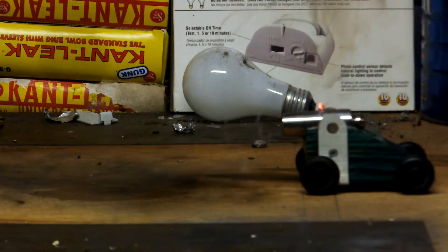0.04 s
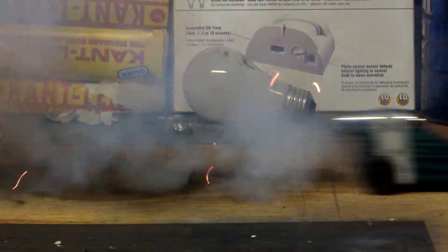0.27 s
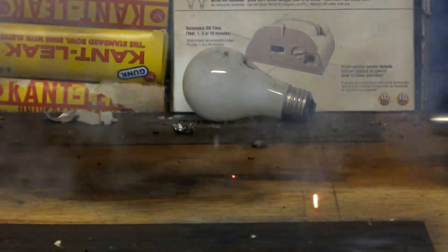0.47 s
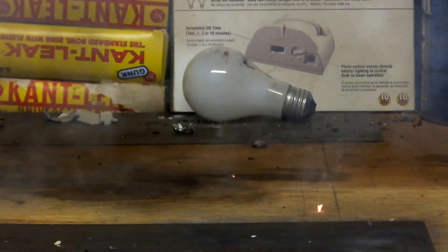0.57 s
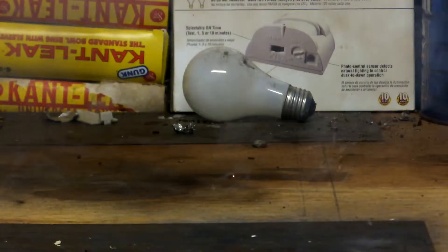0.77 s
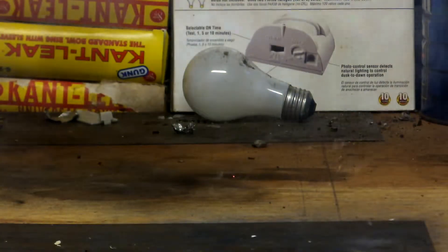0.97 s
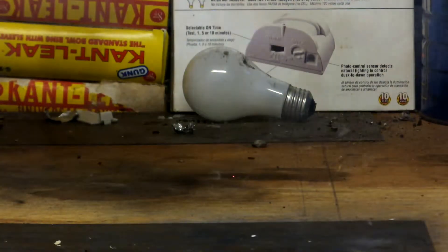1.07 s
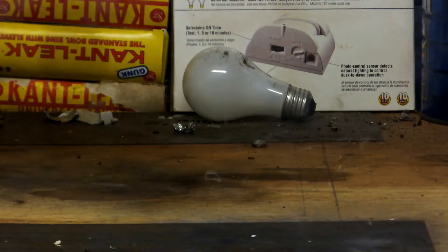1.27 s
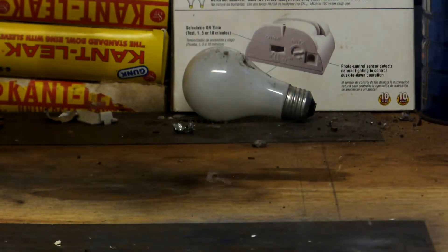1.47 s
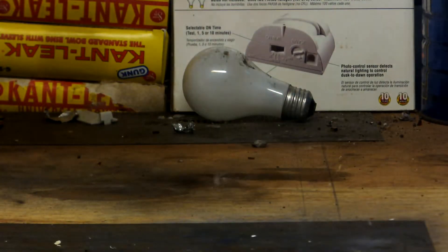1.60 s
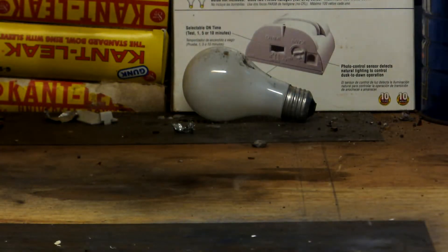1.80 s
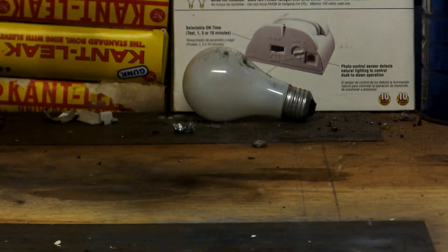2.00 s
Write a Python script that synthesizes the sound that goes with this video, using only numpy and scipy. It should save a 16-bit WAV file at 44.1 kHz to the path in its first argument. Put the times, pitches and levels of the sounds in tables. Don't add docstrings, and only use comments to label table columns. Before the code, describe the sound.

A tiny powder cannon fires one overloaded bang that booms through a large hard room

```python
import sys
import numpy as np
from scipy import signal
from scipy.io import wavfile
from scipy.ndimage import uniform_filter1d

SR = 44100
rng = np.random.default_rng(int(sys.argv[2]) if len(sys.argv) > 2 else 0)


def makeup_ratio(level_db):
    decades = np.asarray(level_db, float) / 20
    return 10 ** decades


def waveform_to_disk(signal):
    frames = np.transpose(np.atleast_2d(signal))
    scaled = np.clip(frames, -1, 1) * 32767
    samples = np.round(scaled).astype(np.int16)
    wavfile.write(sys.argv[1], SR, samples)


N = 90404

# (frequency [Hz], level [dB per Hz])
FLOOR_COLOUR = [(25, -20), (90, -8.5), (290, -8.5), (800, -15), (1900, -16), (4000, -24), (8000, -29),
                (15600, -31)]
# (frequency [Hz], level [dB], width [Hz])
HUM_BANDS = [(104.8, -64, 8), (146.3, -54, 18), (319, -53.5, 22)]
# (frequency [Hz], likeness [0-1])
FLOOR_LIKENESS = [(60, 0.66), (180, 0.94), (550, 0.33), (1650, 0.37), (5000, 0.3), (15000, .94)]
# (frequency [Hz], likeness [0-1])
BLAST_LIKENESS = [(60, .96), (180, .93), (550, .99), (1200, .985), (2300, .94), (5000, .87), (15000, .99)]
# (frequency [Hz], left minus right [dB])
STEREO_LEAN = [(60, -6.5), (240, -1.5), (950, -.5), (3770, -1), (15000, -0.1)]
# (time [s], level [dB])
FIZZ_LEVEL = [(0, -50), (.1, -48.5), (.2, -52.5), (.7, -47), (1.05, -45.5), (1.14, -47.5), (1.25, -45),
              (1.45, -47), (1.7, -61.5), (2.05, -61.5)]
# (time [s], peak level [dB], centre [Hz], sharpness [Q])
EMBERS = [(0.0107, -37.5, 3360, 4.5), (0.0116, -41, 1580, 4), (0.1122, -35, 3320, 5.3),
          (.1116, -39, 1550, 4.4), (0.544, -23.5, 13000, 1.1), (.6354, -31, 7000, 0.89),
          (0.645, -31, 13000, 1.2), (0.657, -38, 10000, 1.5), (0.662, -33.5, 10500, 2.1),
          (0.687, -32, 11900, 1.5), (0.727, -27, 12500, 1), (.8094, -38, 9000, 1), (.963, -39, 6570, 2),
          (1.0486, -26.5, 7920, 0.84), (1.1012, -30.5, 12000, 2.2), (1.166, -41.5, 12000, 1),
          (1.1803, -31, 14800, 2.37), (1.182, -34, 4500, 0.88), (1.194, -28, 3400, 1.4),
          (1.196, -34, 12050, 1), (1.222, -31, 9000, 1.4), (1.2317, -36, 9000, 1),
          (1.2382, -32.5, 9000, 0.96), (1.2534, -34, 6070, 1.1), (1.274, -38, 10500, 1.5),
          (1.2966, -44, 11000, 1), (1.3267, -30, 9000, 1.1), (1.414, -41, 8400, 1.5),
          (1.7292, -37, 5000, 0.56), (1.8248, -44.5, 8500, 3.3)]
# (time [s], level [dB], T60 [s])
RATTLES = [
    (0.56, -26.5, 0.18),
    (0.671, -29, .1),
    (0.692, -20, 0.13),
]
# (frequency [Hz], width [Hz], level [dB])
RATTLE_BANDS = [(5480, 380, 1.5), (5900, 170, 2.5), (7800, 500, -15)]
# (time [s], level [dB], centre [Hz])
FAR_KNOCKS = [
    (.893, -34, 700),
    (1.488, -35, 1500),
    (1.724, -47, 2500),
]
# (frequency [Hz], level [dB per Hz])
BOOM_COLOUR = [(30, -48), (75, -39), (130, -20), (330, -8), (600, -3.5), (1650, -9), (2800, -17),
               (8000, -19.5), (15600, -22)]
# (frequency [Hz], T60 [s])
ROOM_DECAY = [(60, 0.6), (150, 2.55), (400, 2.416), (800, 1.67), (1600, 1.117), (3500, 0.76), (7000, 0.58),
              (14000, 0.29)]
# (frequency [Hz], time [s])
ROOM_FILL = [(100, 0.42), (400, 0.23), (900, 0.1), (2000, 0.037), (8000, 0.037)]
# (frequency [Hz], lift [dB])
FAR_END_LIFT = [(400, -4.5), (1500, 3), (5000, 5.5), (14000, 3.5)]
# (frequency [Hz], level [dB per Hz])
CRACK_COLOUR = [(60, -38.5), (150, -11), (400, 4.5), (700, 0.5), (1500, -5.5), (2600, -8), (8000, -9),
                (15600, -15)]
# (frequency [Hz], T60 [s])
NEAR_WALL_DECAY = [(100, 0.23), (400, 0.57), (1500, 0.49), (3000, .12), (10000, .1)]
# (frequency [Hz], level [dB], T60 [s])
STANDING_WAVES = [(103, -16, 4), (157.1, -8, 4), (160.6, -12, 5), (164.1, -6, 3), (196.7, -8, 3.2),
                  (360.8, -3, 3), (366.8, -2, 3), (402.5, -3, 3), (408.8, 2, 2.8), (449.5, -3, 3),
                  (474.8, -3, 3), (581.5, -1, 2.8), (602, -2, 3), (641.8, -2, 2.8)]
# (time [s], gain [dB])
RECORDER_GAIN = [(0, -6.5), (.225, -6), (.25, -6.5), (.29, -11), (.33, -16.5), (.37, -17), (.45, -12.5),
                 (.52, -12.5), (.75, -13), (1.05, -10), (1.12, -12), (1.5, -9), (2.05, -8.5)]

FLOOR_DB = -44
FIZZ_PER_S, FIZZ_LOW_HZ = 6300, 5000
SEETHE_S, SEETHE_WIDTH_S, SEETHE_HZ, SEETHE_DB = 1.64, .2, 8500, -58.5
TICK_S, TICK_DB, TICK_WET_DB = 0.00084, 6.5, -15
KNOCK_DB, KNOCK_T60_S = -3.5, 0.37
FIRE_S, BUILD_S = .2241, .008
FLASH_S, FLASH_DB, FLASH_HISS_DB = .0042, -32, -13
BLAST_DB, PULSE_S = -16, .0005
BOOM_DB, CRACK_DB, FILL_START = 1.5, 2, 0.56
LATE_DB, LATE_STRETCH = -20.5, 2.35
RETURN_S, RETURN_WIDTH_S = 0.45, 0.082
WAVES_DB, WAVES_BUILD_S = -10.5, 0.23
THUMP_HZ, THUMP_DB, THUMP_T60_S = 111, -4, 0.074
MIC_LOW_HZ, CEILING, KNEE = 45, 0.96, 3


def evened(x):
    return x / np.sqrt(np.mean(x ** 2) + 1e-20)


def read(points, hz):
    f, value = np.transpose(points)
    return np.interp(np.log(hz + 1), np.log(f + 1), value)


def along(points):
    return np.interp(np.arange(N) / SR, *np.transpose(points))


def add(mix, s, sound):
    part = mix[round(s * SR):][:len(sound)]
    part += sound[:len(part)]


def high_pass(x, hz):
    return signal.sosfilt(signal.butter(2, hz, "high", fs=SR, output="sos"), x)


def resonate(x, hz, width):
    turn = np.exp(2j * np.pi * hz * np.arange(len(x)) / SR)
    r = np.exp(-np.pi * width / SR)
    return 2 * (turn * signal.lfilter([1 - r], [1, -r], x / turn)).real


def resonate_twice(x, hz, width):
    return resonate(resonate(x, hz, width), hz, width)


def noise(gain, same, patchy_db):
    frames, hz = N // 256 + 5, np.fft.rfftfreq(1024, 1 / SR)
    a, b, c, d, patches = rng.standard_normal((frames, 513, 5)).T
    patches = uniform_filter1d(patches, size=10, axis=0)
    patches = evened(uniform_filter1d(patches, size=8, axis=1))
    like = np.clip(read(same, hz), 0, 1)[:, None]
    lean = makeup_ratio(read(STEREO_LEAN, hz) / 2)[:, None]
    left = a + 1j * b
    right = like * left + np.sqrt(1 - like ** 2) * (c + 1j * d)
    z = np.array([left * lean, right / lean])
    z *= gain(hz[:, None], np.arange(frames) * 256 / SR) * makeup_ratio(patchy_db * patches)
    return signal.istft(z, nperseg=1024, noverlap=768)[1][:, :N]


def room_tone():
    def gain(hz, s):
        return makeup_ratio(read(FLOOR_COLOUR, hz)) + 0 * s

    hiss = evened(noise(gain, FLOOR_LIKENESS, patchy_db=.8))
    hum = sum(makeup_ratio(db) * evened(resonate_twice(rng.standard_normal(N), hz, width))
              for hz, db, width in HUM_BANDS)
    return makeup_ratio(FLOOR_DB) * hiss + hum


def far_knocks():
    out, n = np.zeros(N), np.arange(9000)
    for s, db, hz in FAR_KNOCKS:
        thud = rng.standard_normal(9000) * makeup_ratio(db + KNOCK_DB - 60 * n / SR / KNOCK_T60_S)
        add(out, s, 3 * np.minimum(n / 150, 1) * resonate_twice(thud, hz, hz))
    return out


def fizz():
    size = makeup_ratio(3.0 * np.minimum(rng.exponential(1, N), 4))
    crackles = size * (rng.random(N) < FIZZ_PER_S / SR) * rng.standard_normal(N)
    grains = crackles + .25 * rng.standard_normal((2, N))
    high = high_pass(grains, FIZZ_LOW_HZ)
    seethe = evened(resonate_twice(rng.standard_normal(N), SEETHE_HZ, 1500))
    seethe *= makeup_ratio(SEETHE_DB) * np.exp(-((np.arange(N) / SR - SEETHE_S) / SEETHE_WIDTH_S) ** 4)
    return evened(high) * makeup_ratio(along(FIZZ_LEVEL)) + seethe


def ember_ticks():
    out, t = np.zeros(N), np.arange(3000) / SR
    for s, db, hz, sharp in EMBERS:
        direct, reflected = rng.standard_normal((2, len(t)))
        burst = direct * np.exp(-t / TICK_S)
        burst += makeup_ratio(TICK_WET_DB) * reflected * np.exp(-t / .012)
        snap = resonate_twice(burst, hz, 1.5 * hz / sharp)
        add(out, s, makeup_ratio(db + TICK_DB) * snap / (3 * np.std(snap[:100])))
    return out


def carriage_rattle():
    out, t = np.zeros(N), np.arange(6000) / SR
    for s, db, t60 in RATTLES:
        jingle = rng.standard_normal(6000) * makeup_ratio(db - 60 * t / t60)
        add(out, s, 3 * sum(makeup_ratio(level) * resonate_twice(jingle, hz, width)
                            for hz, width, level in RATTLE_BANDS))
    return out


def blast():
    t = np.arange(N) / SR - FIRE_S
    after = np.maximum(t, 0)

    def room_gain(hz, s):
        since = np.maximum(s - FIRE_S, 0)
        age = since / read(ROOM_DECAY, hz)
        fill = 1 - (1 - FILL_START) * np.exp(-(since / read(ROOM_FILL, hz)) ** 2)
        far_end = makeup_ratio(read(FAR_END_LIFT, hz) * np.exp(-((s - RETURN_S) / RETURN_WIDTH_S) ** 2))
        decay = makeup_ratio(-60 * age) + makeup_ratio(LATE_DB - 60 * age / LATE_STRETCH)
        return fill * far_end * makeup_ratio(read(BOOM_COLOUR, hz)) * decay

    def crack_gain(hz, s):
        age = np.maximum(s - FIRE_S, 0) / read(NEAR_WALL_DECAY, hz)
        return makeup_ratio(read(CRACK_COLOUR, hz) - 60 * age)

    def reverberant(gain):
        sound = noise(gain, BLAST_LIKENESS, patchy_db=1.0)
        return sound / np.std(sound[:, round(FIRE_S * SR):round((FIRE_S + .05) * SR)])

    room = reverberant(room_gain) + makeup_ratio(CRACK_DB) * reverberant(crack_gain)
    waves = sum(makeup_ratio(db - 60 * after / t60) * np.sin(2 * np.pi * hz * t)
                for hz, db, t60 in STANDING_WAVES)
    waves = waves * (1 - np.exp(-(after / WAVES_BUILD_S) ** 2))
    room += makeup_ratio(WAVES_DB) * waves * makeup_ratio([[-.8], [.8]])
    room += makeup_ratio(THUMP_DB - 60 * after / THUMP_T60_S) * np.sin(2 * np.pi * THUMP_HZ * after)
    room += (t < 0) * makeup_ratio(FLASH_HISS_DB - FLASH_DB) * np.diff(rng.standard_normal(N + 1))
    flash = makeup_ratio(FLASH_DB) * np.clip(1 + t / FLASH_S, 0, 1)
    build = (t >= 0) * (0.41 + 0.48 * (1 - np.exp(-after / BUILD_S)))
    swell = np.maximum(flash, build)
    u = after / PULSE_S
    pulse = (t >= 0) * (1 - u) * np.exp(-u)
    return makeup_ratio(BOOM_DB) * swell * room + makeup_ratio(BLAST_DB) * pulse


def scene():
    return room_tone() + far_knocks() + fizz() + ember_ticks() + carriage_rattle() + blast()


def low_pass(x):
    return signal.sosfilt(signal.butter(12, 15800, fs=SR, output="sos"), x)


def record(dry):
    ducked = high_pass(dry, MIC_LOW_HZ) * makeup_ratio(along(RECORDER_GAIN)) / CEILING
    finished = CEILING * ducked / (1 + abs(ducked) ** KNEE) ** (1 / KNEE)
    return low_pass(finished)


dry = scene()
out = record(dry)
waveform_to_disk(out)
```